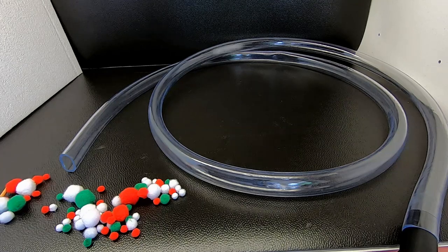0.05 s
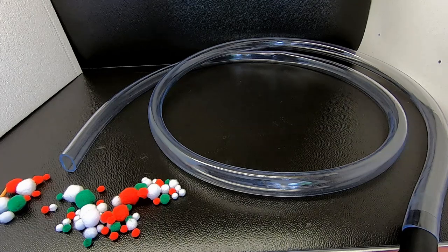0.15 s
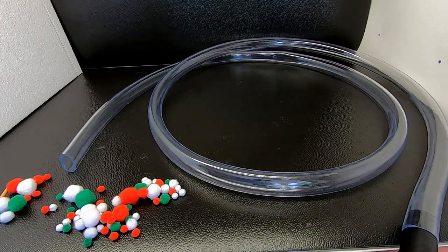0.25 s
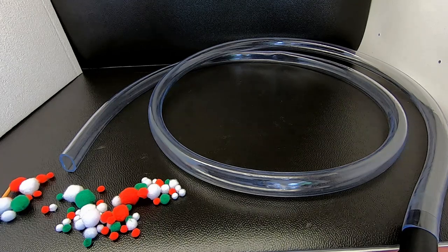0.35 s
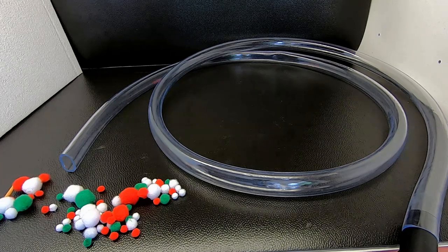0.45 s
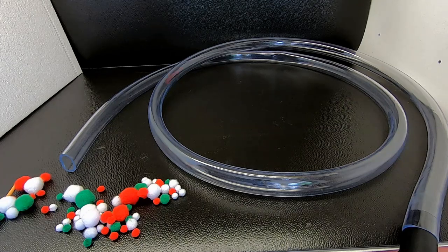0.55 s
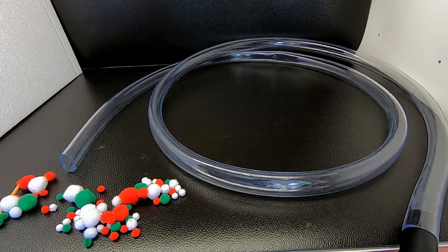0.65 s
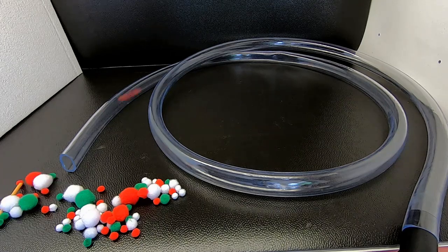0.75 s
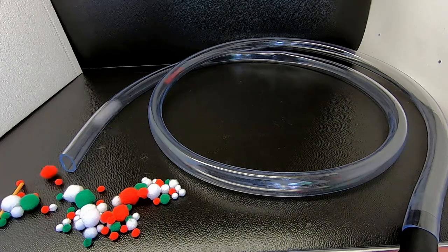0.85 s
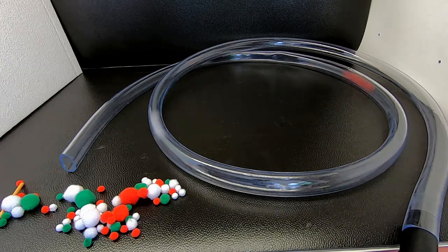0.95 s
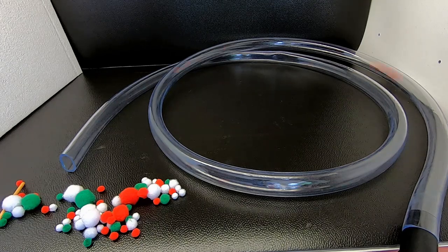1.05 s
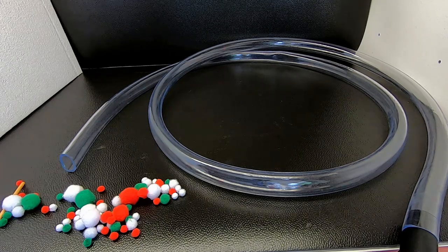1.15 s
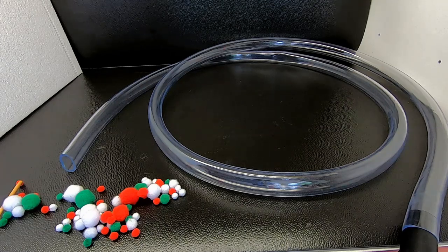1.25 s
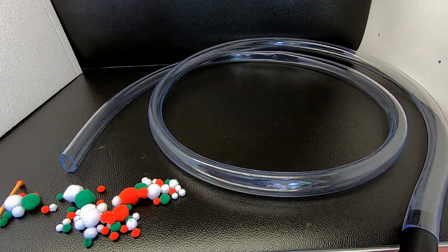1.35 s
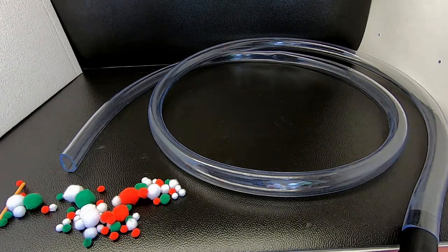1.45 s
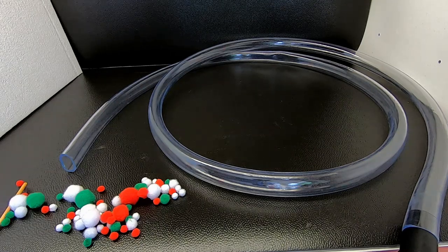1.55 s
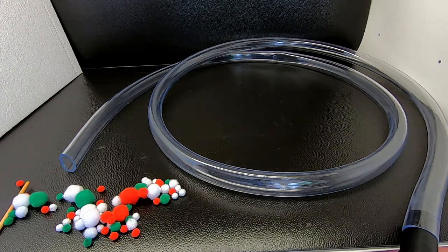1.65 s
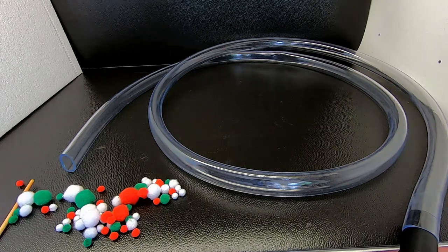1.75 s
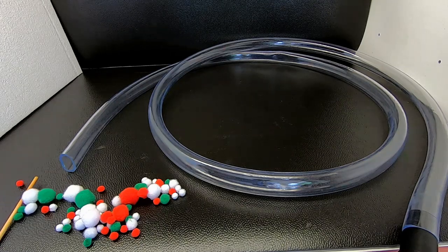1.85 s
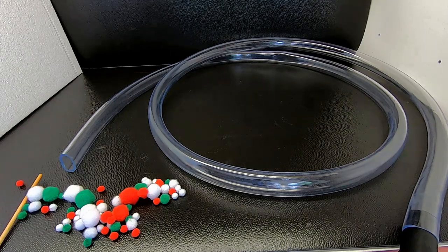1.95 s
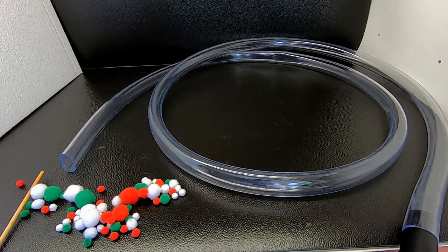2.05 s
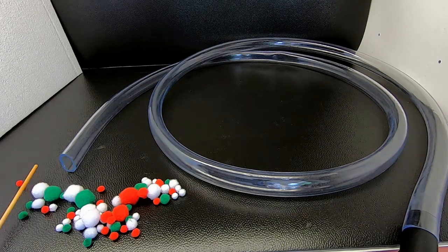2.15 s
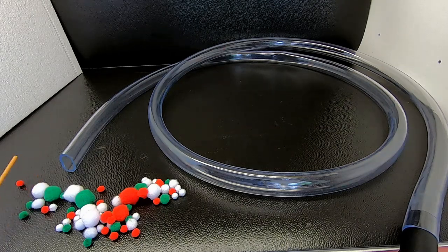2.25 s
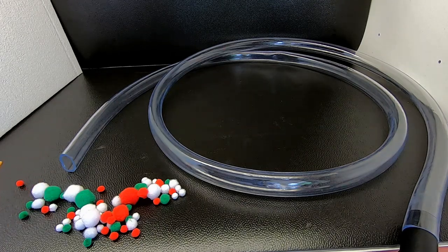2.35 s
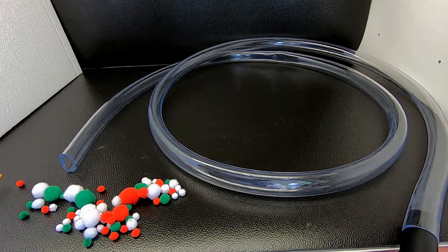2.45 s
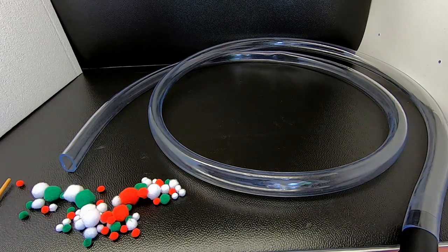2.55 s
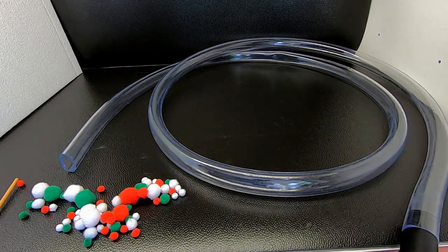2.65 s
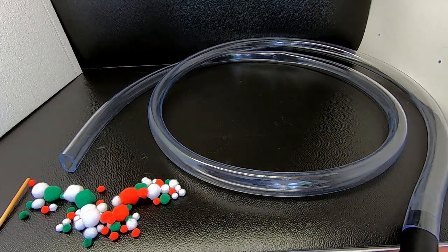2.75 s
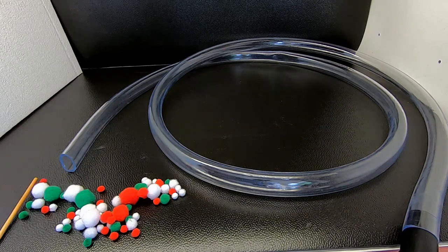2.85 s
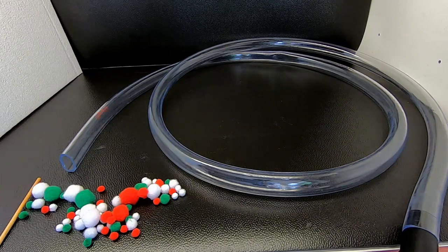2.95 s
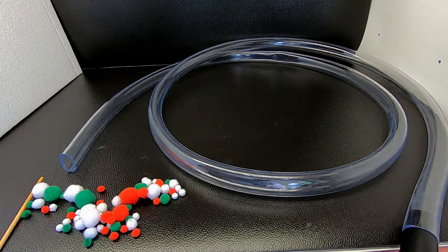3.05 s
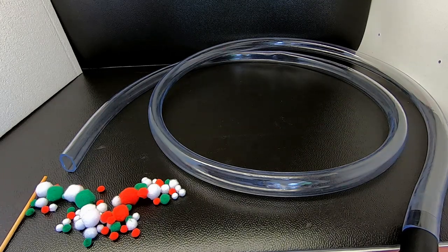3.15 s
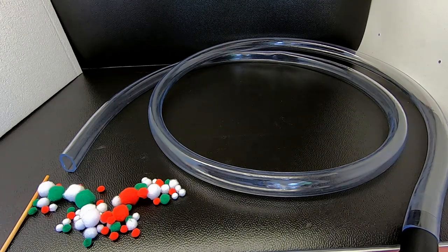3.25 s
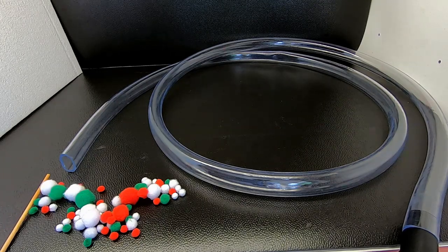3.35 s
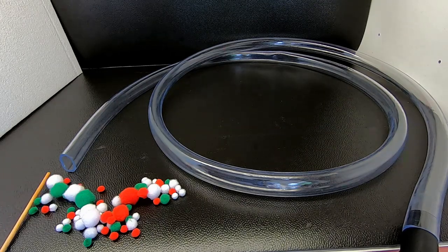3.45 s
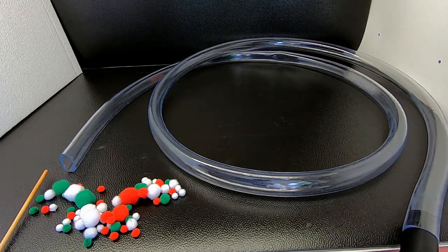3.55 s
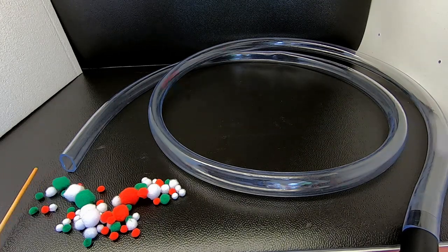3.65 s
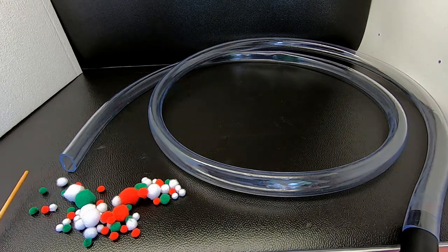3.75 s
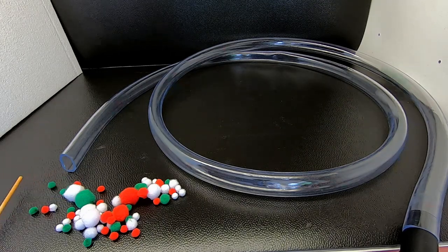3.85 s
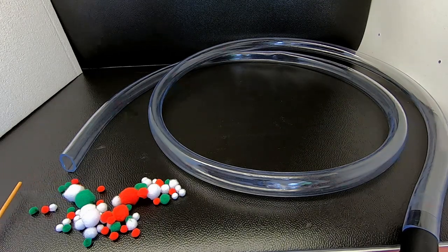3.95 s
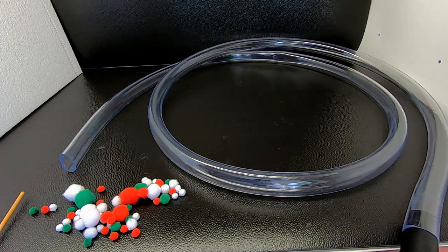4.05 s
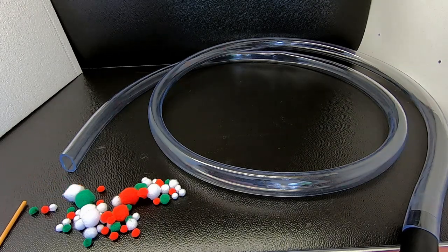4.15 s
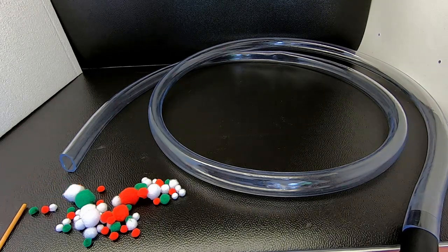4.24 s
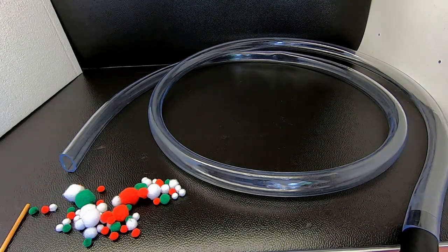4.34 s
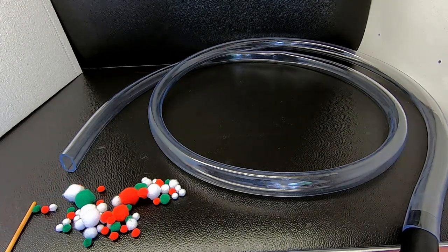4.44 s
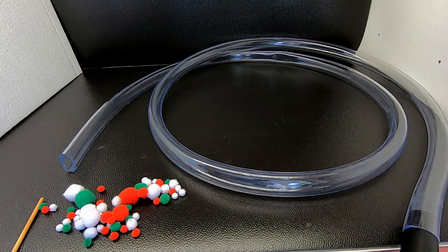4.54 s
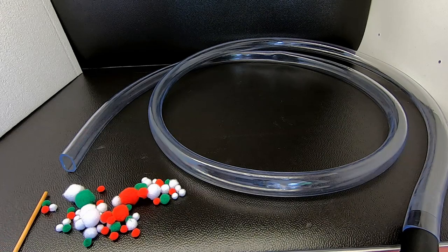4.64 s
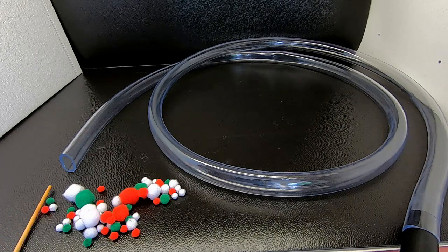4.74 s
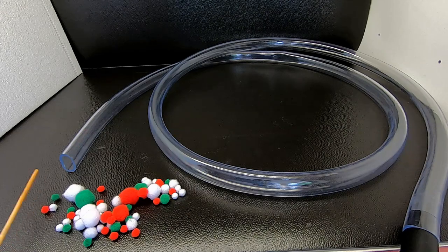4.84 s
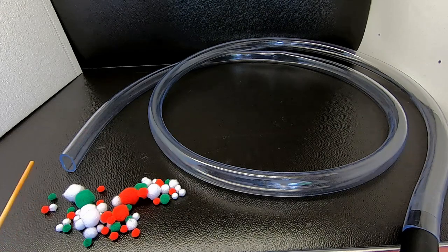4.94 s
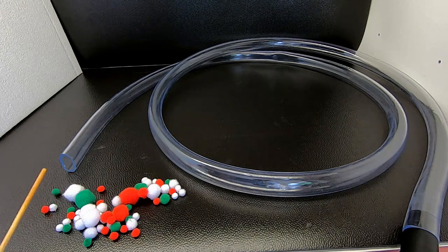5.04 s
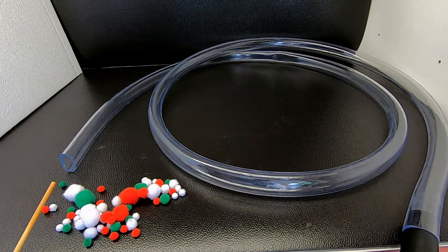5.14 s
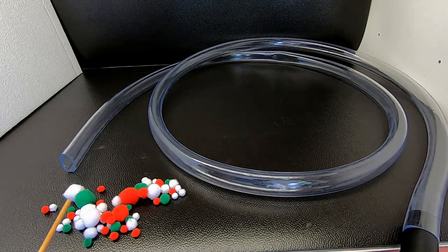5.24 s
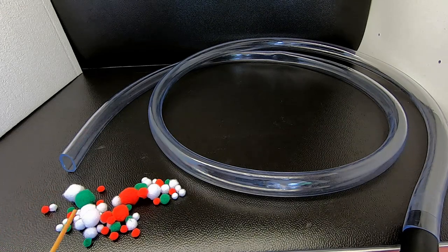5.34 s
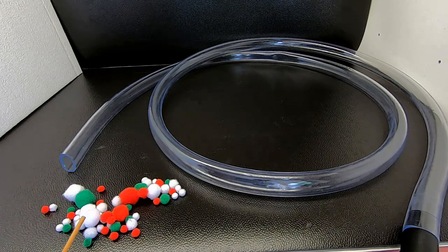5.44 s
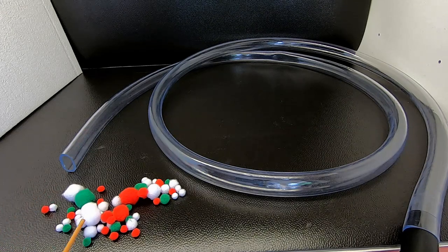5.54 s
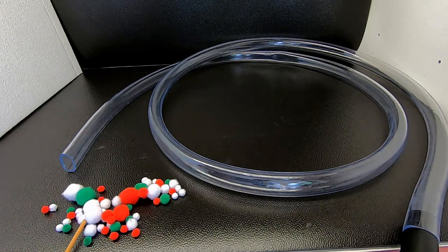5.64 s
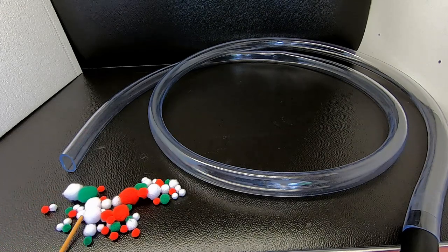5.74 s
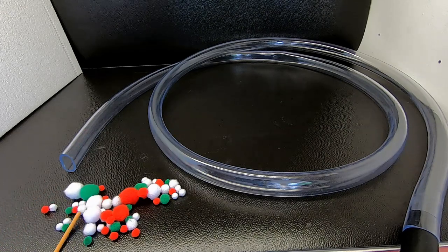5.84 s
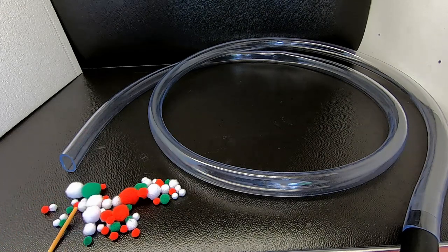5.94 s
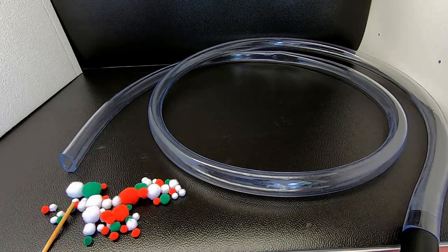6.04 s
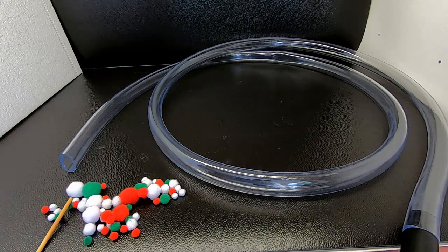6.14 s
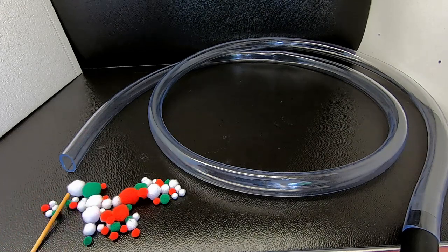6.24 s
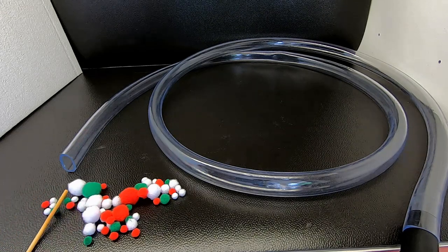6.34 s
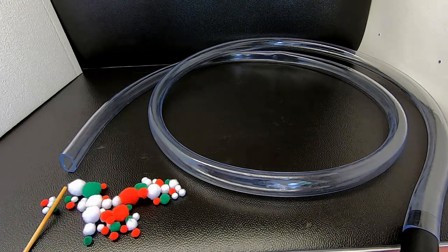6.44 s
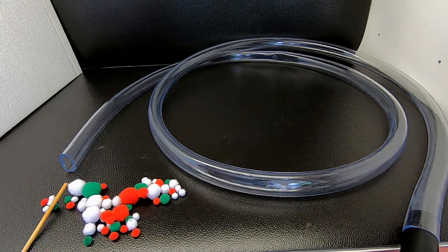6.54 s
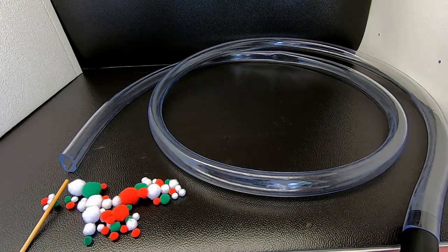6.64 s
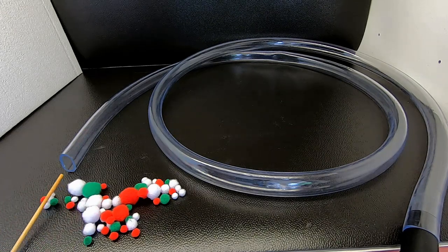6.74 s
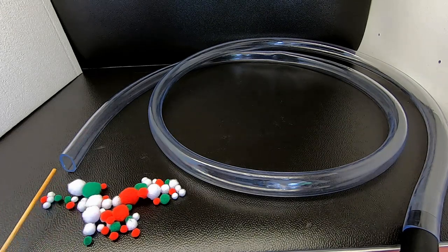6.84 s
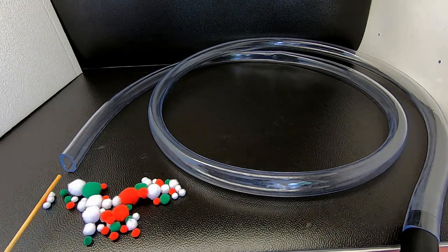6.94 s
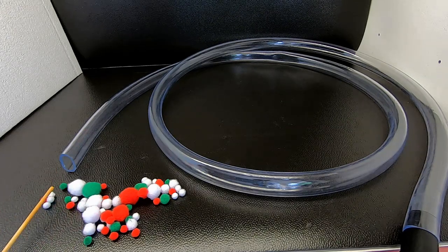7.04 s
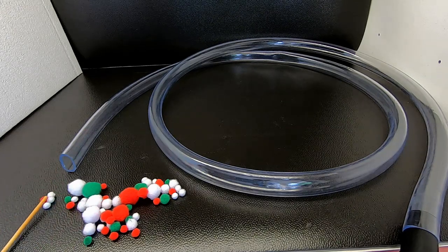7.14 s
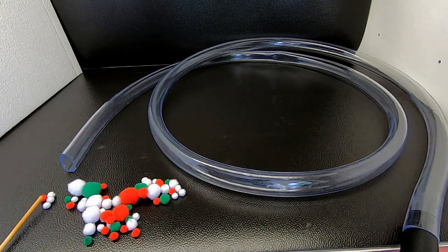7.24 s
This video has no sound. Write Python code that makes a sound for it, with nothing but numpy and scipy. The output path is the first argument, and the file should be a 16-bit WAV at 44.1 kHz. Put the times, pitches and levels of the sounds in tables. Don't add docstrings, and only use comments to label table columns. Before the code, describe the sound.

A vacuum cleaner pulls air continuously through a long coiled plastic tube, making low rumble, broad hiss and a faint high whine. Soft balls plug the opening with dull low thuds, then pop loudly from the far end with a hollow boom and brief boxy ring. Two busy clusters come early and midway, with quieter stretches between and after. Close stereo microphone in a small hard-walled box; the background dips after loud pops.

```python
import sys
import numpy as np
from scipy import signal
from scipy.fft import rfft, irfft, next_fast_len
from scipy.io import wavfile
from scipy.ndimage import uniform_filter1d

SR = 44100
rng = np.random.default_rng(int(sys.argv[2]) if len(sys.argv) > 2 else 0)


def nominal_scale(level):
    x = np.asarray(level, float) / 20
    return 10 ** x


def file_out(sig):
    cols = np.atleast_2d(sig).T
    lim = np.clip(cols, -1, 1)
    pcm = np.round(lim * 32767).astype(np.int16)
    wavfile.write(sys.argv[1], SR, pcm)


N = 321489

# (time [s], pop peak [dB], boom [dB], box ring [dB])
POPS = [(.156, -11, -4, 0), (1.0822, -8.5, -2.5, 1), (1.1348, -12, -3.5, 2), (3.7219, -11, -4, 0),
        (3.9337, -12, -8, 0), (.674, -21.5, -22, -2.5), (.779, -28.5, -33, -3), (.974, -25, -21, 5),
        (1.053, -25, -23, 6), (1.179, -24, -19, 1), (3.1965, -19, -29, 0), (3.778, -25, -35, 1),
        (4.0233, -18, -21.5, 2.5), (4.165, -21, -25.5, -5), (4.273, -21.5, -28, 3), (4.2922, -24, -36, 2),
        (5.426, -20, -25.5, -.5)]
# (time [s], boom peak [dB])
THUDS = [
    (0.016, -16),
    (0.042, -23),
    (0.882, -13),
    (0.925, -15),
    (1.506, -19.5),
    (3.481, -49),
    (3.537, -13.5),
    (3.59, -16),
]
# (time [s], level [dB], half length [s])
GULPS = [
    (.18, -2, .02),
    (1.102, -4, .02),
    (3.889, -9, .008),
]
# (frequency [Hz], level [dB], decay to -60 dB [s])
COLUMN_MODES = [(105, 0, .17), (150, -9, .1), (208, -20, .1), (303, -14, .15)]
# (frequency [Hz], level [dB], decay to -60 dB [s])
BOX_MODES = [(325, -1, .08), (420, -3, .09), (552, 1, .08), (834, -8, .06), (990, -9, .05),
             (1250, -13, .03), (1600, -8, .03), (1850, -11, .045), (2550, -11, .025)]
# (delay [ms], left [dB], right [dB])
WALL_ECHOES = [(.8, -4, -8), (2.0, -10, -6), (4.3, -11, -13), (5.7, -13, -11), (6.9, -10, -13),
               (8.6, -16, -16), (11.5, -17, -18), (21, -17, -17)]
# (frequency [Hz], density [dB per Hz])
RUMBLE_SPECTRUM = [(8.8, -50), (15, -24), (37, 2.5), (76, -9.5), (108, -1), (141, -8.5), (189, -16),
                   (301, -18.5), (424, -13.5), (461, -25.5), (494, -17), (567, -18), (628, -23.5),
                   (826, -28), (900, -29), (1170, -50), (1980, -120)]
# (frequency [Hz], density [dB per Hz])
HISS_SPECTRUM = [(560, -37), (700, -15.5), (1000, -11.5), (1500, -6), (2510, -5.5), (3000, -11.5),
                 (3600, -17), (4200, -18.5), (9300, -18.5), (11200, -30.5), (14200, -41.5), (15200, -42),
                 (15750, -54), (16000, -85)]
# (frequency [Hz], width [Hz], level [dB], left minus right [dB])
BOX_RIDGES = [(102.7, 9.6, 4.5, -0.5), (301, 6.2, 4, 0), (551, 37, 2.5, 4), (635, 63, -16.5, 16),
              (870, 34, 3.5, 3), (888, 31, -8.5, 3), (991, 65, 13, -5.5), (1022, 37, -12.5, 10),
              (1545, 40, -2, -11), (1790, 230, -4, -2.5), (1831, 8, 6, -15), (2133, 19, -16, 13),
              (2896, 57, -0.5, -15), (3440, 350, 4.5, 1)]
# (frequency [Hz], correlation [-1..1])
PORT_LIKENESS = [(30, 0.98), (110, 1), (300, 0.96), (520, 0.97), (680, 0.81), (1100, 0.09), (1500, 0.93),
                 (1950, -0.14), (2450, 0.68), (3500, 0.8), (4400, 0.28), (5200, 0.41), (7000, 0.062),
                 (15000, -0.49)]
# (frequency [Hz], left minus right [dB])
PORT_LEAN = [(250, 0), (400, 2.5), (600, -5.5), (1290, 3.5), (2380, 0), (4400, -0.2), (8800, -2.5),
             (12000, 1.5)]
# (frequency [Hz], width [Hz], level [dB])
TUBE_WAVES = [(30.8, 17, 4.5), (42, 8, -9), (60.7, 17, 4), (83.4, 4.5, -4), (113, 6.6, 6), (200, 6.4, -7)]
# (frequency [Hz], width [Hz], level [dB], left minus right [dB], swell [dB])
EDGE_TONES = [(2151, 14, -48.5, -4, 0.5), (2438, 29, -50, -2, 0.5), (2484, 30, -51, -5, 1.5),
              (2600, 60, -53.5, -12, 0.5), (10950, 50, -77, 0, 6), (11600, 50, -83, 0, 6),
              (11950, 60, -82, 0, 6)]
# (time [s], frequency [Hz], level [dB])
BLADE_TONE = [(0, 5914, -60.5), (.9, 5913, -58), (1.22, 5925, -58.5), (2.2, 5908, -55), (3.2, 5913, -59),
              (3.7, 5920, -54.5), (4.1, 5926, -54.5), (5.1, 5918, -51.5), (5.8, 5913, -58),
              (7.3, 5910, -60)]
# (multiple of shaft speed, level [dB], left minus right [dB])
SHAFT_ORDERS = [(1, -51, -2), (2, -58, -6), (3, -65, 0), (7, -66, 0), (9, -68, 4), (16, -67, 4),
                (24, -88, 4)]

BLADES = 12
SAG_RISE_S, SAG_FALL_S = 0.18, 0.27
HALVES = np.array([[.5], [-.5]])


def evened(x):
    return x / np.sqrt(np.mean(x ** 2) + 1e-20)


def read(points, hz):
    f, value = np.transpose(points)
    return np.interp(np.log(hz + 1), np.log(f + 1), value)


def column(table, count, t):
    rows = np.array(table)
    return np.interp(t, rows[:, 0], rows[:, count])


def sides(lean_db):
    return nominal_scale(HALVES * lean_db)


def resonance(hz, centre_hz, width_hz):
    return 1 / (1 + (2 * (hz - centre_hz) / width_hz) ** 2)


def add(mix, s, sound):
    part = mix[:, max(round(s * SR), 0):][:, :sound.shape[1]]
    part += sound[:, :part.shape[1]]


def drift(top_hz):
    t = np.arange(0, N + 256, 256) / SR
    slow = 0
    for f in np.geomspace(.15, top_hz, num=20):
        slow = slow + np.sin(2 * np.pi * (f * t + rng.random())) / np.sqrt(f)
    return np.interp(np.arange(N) / SR, t, evened(slow))


def burst(hz, cycles, t):
    return -np.cos(2 * np.pi * hz * t) * np.exp(-(hz * t / cycles) ** 2)


def ring(modes, t, start_turn, rise_s):
    tones = 0
    for hz, db, t60 in modes:
        tones = tones + nominal_scale(db - 60 * t / t60) * np.cos(2 * np.pi * (hz * t + start_turn))
    return tones * (1 - np.exp(-(t / rise_s) ** 2))


def pop(s, pop_db, boom_db, box_db):
    lead_s, pop_hz = .012, 1290
    t = np.arange(round(.35 * SR)) / SR - lead_s
    release = t - .0007
    snap = sides(6.) * burst(pop_hz, .62, release)
    for ms, left_db, right_db in WALL_ECHOES:
        snap += nominal_scale([[left_db], [right_db]]) * burst(pop_hz * 1.2, .5, release - ms / 1000)
    struck = np.array(BOX_MODES) + rng.standard_normal((len(BOX_MODES), 3)) * [15, 2.5, 0]
    snap += nominal_scale(box_db - 8.5) * ring(struck, np.maximum(t - .001, 0), -.25, .0008)
    crack = nominal_scale(-20 + boom_db - pop_db) * burst(2500, .6, release)
    puff = nominal_scale(-5 + box_db) * burst(400, .5, t - .0023)
    snap += crack - puff
    snap += nominal_scale(-16) * rattle(t - .001)
    flutter = nominal_scale(-16 + .75 * boom_db) * burst(780, 1.25, t + .005)
    inrush = -.36 * burst(130, .3, t - .0022)
    boom = nominal_scale(boom_db + 3) * (inrush + ring(COLUMN_MODES, np.maximum(t, 0), -.07, .0035))
    return s - lead_s, nominal_scale(pop_db + 1.5) * snap + flutter + boom


def rattle(t):
    band = signal.butter(3, [270, 560], "band", fs=SR)
    scatter = signal.lfilter(*band, rng.standard_normal((2, len(t))))
    shared = evened(scatter + .8 * scatter[::-1])
    return shared * nominal_scale(-60 * t / .17) * np.clip(t / .003, 0, 1)


def thud(s, boom_db):
    t = np.arange(round(.25 * SR)) / SR
    return s, nominal_scale(boom_db) * ring(COLUMN_MODES, t, .17, .004)[None]


def starved(t):
    s, _, boom_db, _ = np.transpose(POPS)
    since = np.maximum(t[:, None] - s, 0)
    return (1 - np.exp(-since / SAG_RISE_S)) ** 2 * np.exp(-since / SAG_FALL_S) @ nominal_scale(boom_db) * 4


def flow(t):
    s, _, boom_db, _ = np.transpose(POPS)
    stir_lead_s, stir_s, stir_db = .02, .14, -28
    stir = np.exp(-((t[:, None] - s + stir_lead_s) / stir_s) ** 2) @ nominal_scale(boom_db + stir_db)
    sag = starved(t)
    return np.hypot(nominal_scale(-30.5 - 2 * sag), stir), nominal_scale(-36.5 - 1.5 * sag)


def air():
    size, hop = 2048, 512
    frames, hz = N // hop + 6, np.fft.rfftfreq(size, 1 / SR)
    t = np.arange(frames) * hop / SR
    a, b, c, d, patches = rng.standard_normal((frames, len(hz), 5)).T
    patches = uniform_filter1d(patches, size=20, axis=0)
    patches = evened(uniform_filter1d(patches, size=5, axis=1))
    flicker = evened(uniform_filter1d(rng.standard_normal(frames), size=3))
    same = np.clip(read(PORT_LIKENESS, hz), -1, 1)[:, None]
    left = a + 1j * b
    right = same * left + np.sqrt(1 - same ** 2) * (c + 1j * d)
    z = np.array([left, right])
    box_db = HALVES * read(PORT_LEAN, hz) * (hz > 200)
    for f, width, db, lean_db in BOX_RIDGES:
        box_db = box_db + (db + HALVES * lean_db) * resonance(hz, f, width)
    ripple = evened(uniform_filter1d(rng.standard_normal((len(hz), 2)), size=2, axis=0)).T
    box_db = box_db + 2.3 * ripple * np.clip(hz / 1200 - .2, 0, 1)
    rumble_gain, hiss_gain = flow(t)
    rumble = evened(nominal_scale(read(RUMBLE_SPECTRUM, hz) + box_db))[:, :, None] * rumble_gain
    hiss = evened(nominal_scale(read(HISS_SPECTRUM, hz) + box_db))[:, :, None] * hiss_gain
    level = np.hypot(rumble, hiss) * nominal_scale(0.38 * patches + .5 * flicker)
    unit = signal.istft(z[0], nperseg=size, noverlap=size - hop)[1].std()
    return signal.istft(z * level, nperseg=size, noverlap=size - hop)[1][:, :N] / unit


def tube(x):
    size = next_fast_len(N)
    hz = np.fft.rfftfreq(size, 1 / SR)
    lift_db = sum(db * resonance(hz, f, width) for f, width, db in TUBE_WAVES)
    return irfft(rfft(x, size) * nominal_scale(lift_db), size)[:, :N]


def whistles():
    t, out = np.arange(N) / SR, np.zeros((2, N))
    for hz, width, db, lean_db, swell_db in EDGE_TONES:
        r = np.exp(-np.pi * width / SR)
        noise = rng.standard_normal((N, 2)) @ [1, 1j]
        wander = signal.lfilter([1], [1, -2 * r, r * r], noise)
        tone = wander * np.exp(2j * np.pi * hz * t)
        ports = np.array([tone.real, (tone * np.exp(-.8j)).real])
        out += sides(lean_db) * nominal_scale(db + swell_db * drift(1.26)) * evened(ports)
    sag = np.interp(t, t[::512], starved(t[::512]))
    return out * nominal_scale(-2 * sag)


def motor():
    t = np.arange(N) / SR
    turns = np.cumsum(column(BLADE_TONE, count=1, t=t)) / SR / BLADES
    blade = np.sin(2 * np.pi * BLADES * turns - np.array([[0], [2.1]]))
    blade_db = 5.5 + column(BLADE_TONE, count=2, t=t) + 0.91 * drift(23)
    out = np.sqrt(2) * sides(3.1) * nominal_scale(blade_db) * blade
    for k, db, lean_db in SHAFT_ORDERS:
        wobble = nominal_scale(db + 2.2 * drift(12))
        tone = np.sin(2 * np.pi * (round(k) * turns + rng.random()))
        out += np.sqrt(2) * sides(lean_db) * wobble * tone
    return out


def scene():
    t = np.arange(N) / SR
    choke_db = sum(db * np.exp(-((t - s) / half_s) ** 2) for s, db, half_s in GULPS)
    mix = (tube(air()) + whistles() + motor()) * nominal_scale(choke_db)
    for row in POPS:
        add(mix, *pop(*row))
    for row in THUDS:
        add(mix, *thud(*row))
    return mix


def duck(excess_db, share, db_per_s):
    fall = np.arange(N) * db_per_s / SR
    return np.maximum.accumulate(share * excess_db + fall) - fall


def low_pass(x):
    return signal.sosfilt(signal.butter(12, 15700, fs=SR, output="sos"), x)


def record(dry):
    power = signal.lfilter([.006], [1, -.994], (dry ** 2).mean(0))
    excess_db = np.maximum(10 * np.log10(power + 1e-12) + 16.5, 0)
    summed_db = signal.lfilter([5 / SR], [1, -np.exp(-2 / SR)], excess_db)
    loss_db = duck(excess_db, share=0.48, db_per_s=153) + summed_db
    ducked = dry / nominal_scale(uniform_filter1d(loss_db, size=100))
    edge = signal.firwin(511, 15700, window=("kaiser", 9), fs=SR)
    mix = signal.oaconvolve(ducked, edge[None], "same")
    return low_pass(mix)


dry = scene()
out = record(dry)
file_out(out)
```